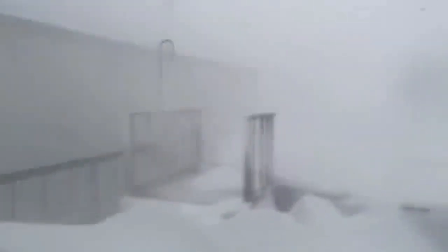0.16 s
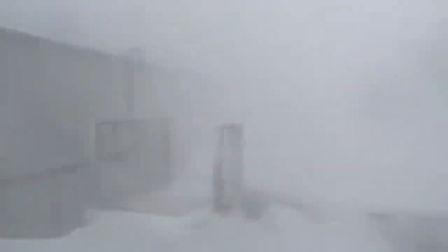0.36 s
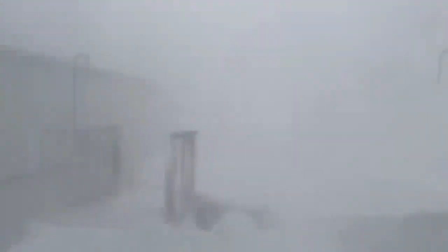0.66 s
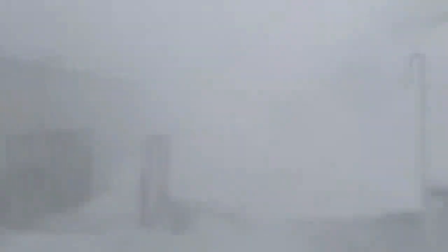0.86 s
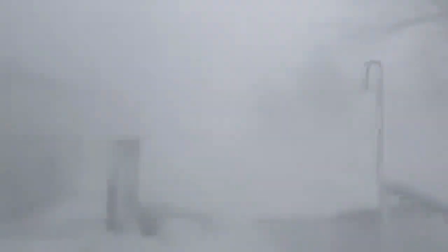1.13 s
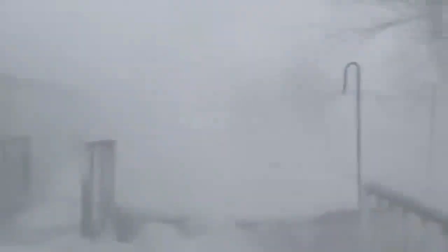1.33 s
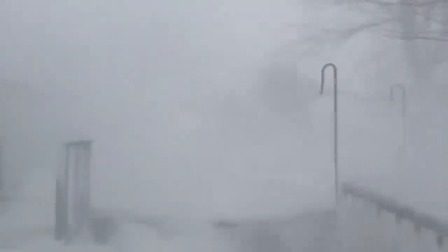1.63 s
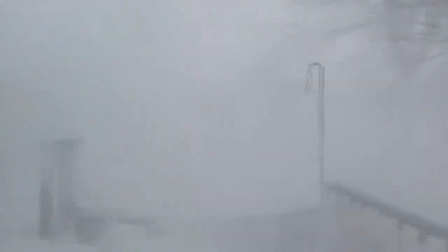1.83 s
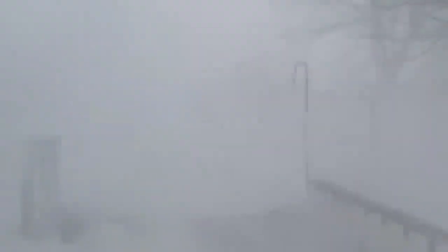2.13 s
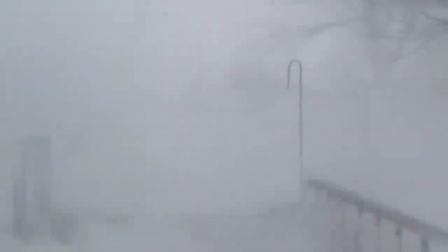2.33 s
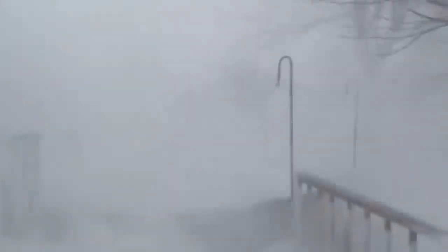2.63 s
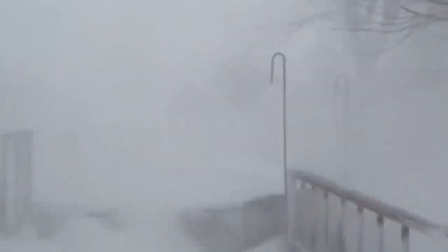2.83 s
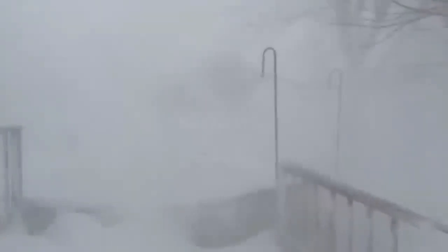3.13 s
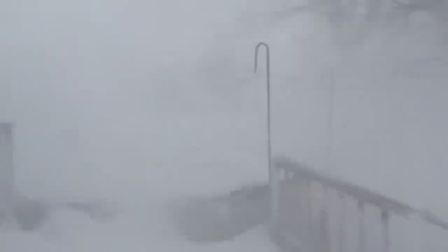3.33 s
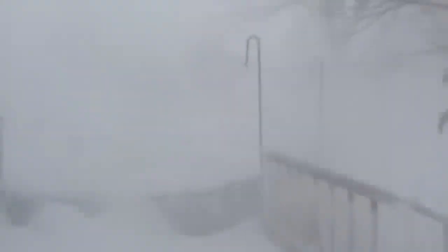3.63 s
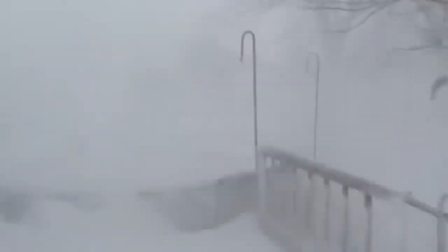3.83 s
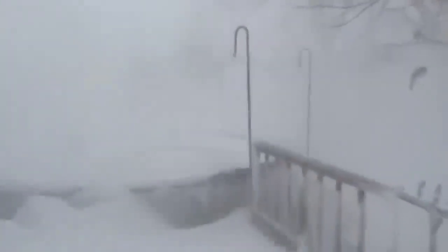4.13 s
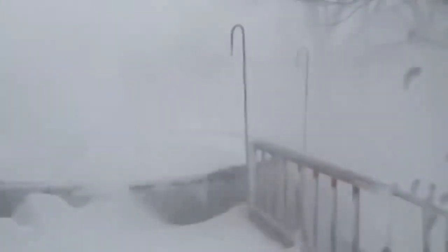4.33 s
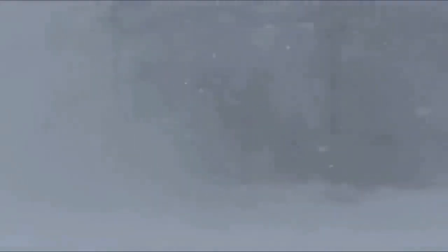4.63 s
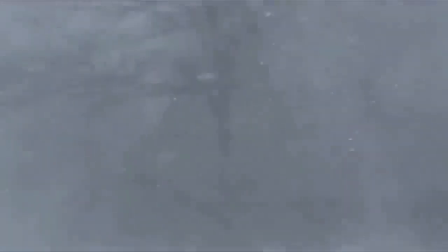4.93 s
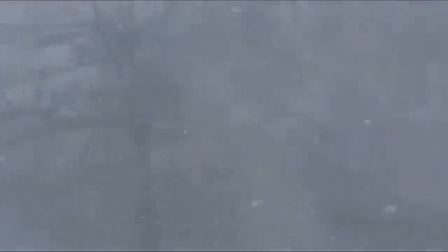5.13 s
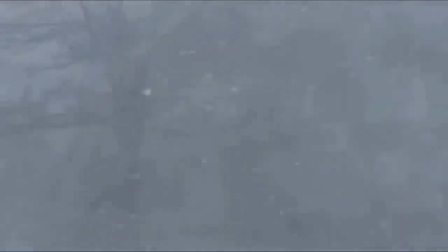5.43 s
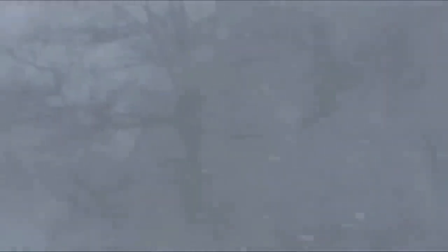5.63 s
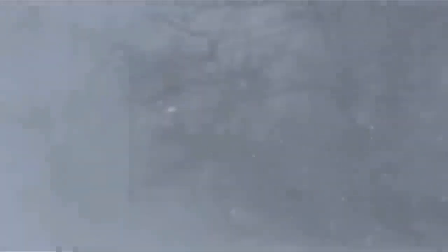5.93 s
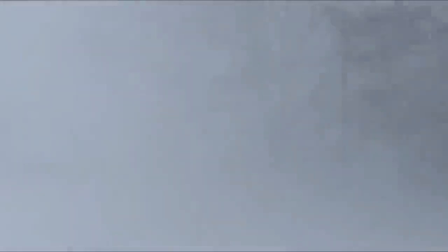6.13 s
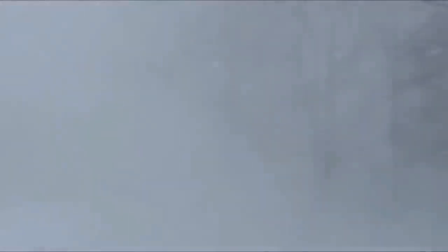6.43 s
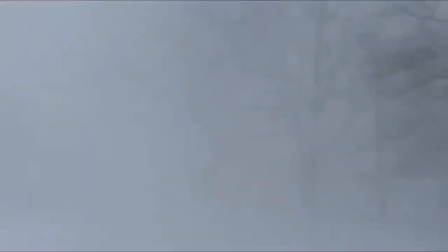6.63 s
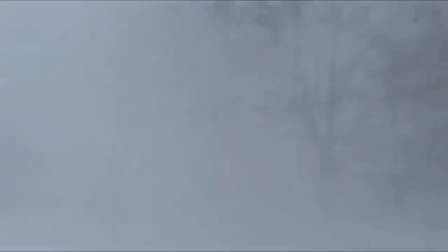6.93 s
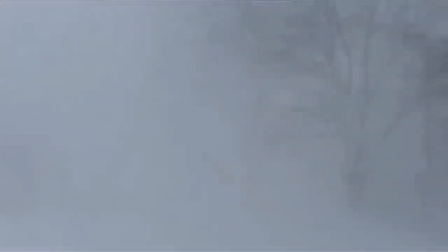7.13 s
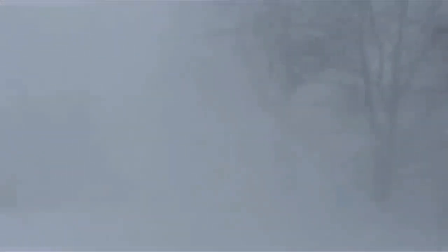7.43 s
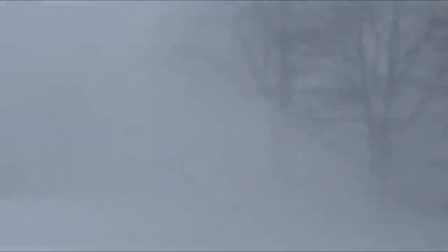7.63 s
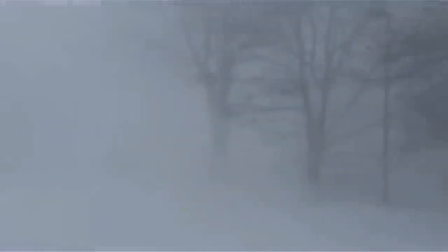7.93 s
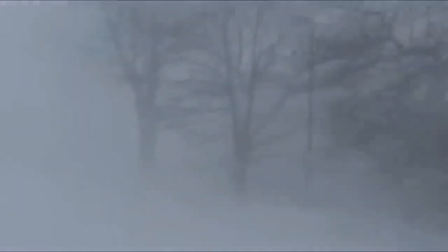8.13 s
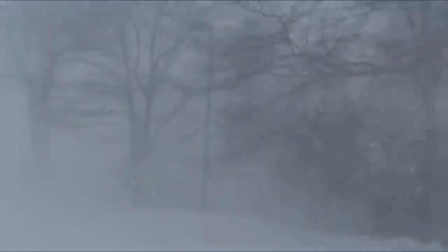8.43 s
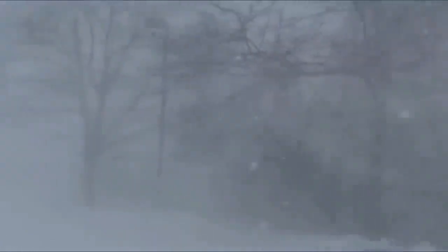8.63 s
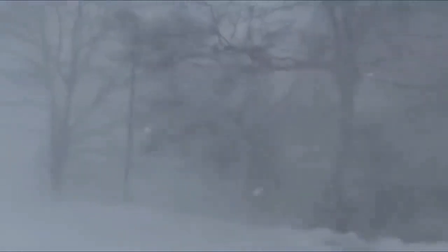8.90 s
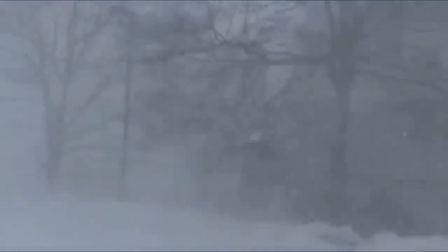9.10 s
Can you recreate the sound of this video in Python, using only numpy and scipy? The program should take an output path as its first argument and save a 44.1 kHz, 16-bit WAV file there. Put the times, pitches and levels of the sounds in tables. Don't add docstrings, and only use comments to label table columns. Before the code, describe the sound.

Gusty snowstorm wind in the open: soft rumbling puffs, a sudden cut, then violent distorted buffeting over a distant roar and snow hiss.

```python
import sys
import numpy as np
from scipy import signal
from scipy.io import wavfile
from scipy.ndimage import uniform_filter1d

SR = 44100
rng = np.random.default_rng(int(sys.argv[2]) if len(sys.argv) > 2 else 0)


def dump(signal):
    limited = np.clip(np.atleast_2d(signal).T, -1, 1)
    pcm = np.round(limited * 32767).astype(np.int16)
    wavfile.write(sys.argv[1], SR, pcm)


def invert_db(level):
    return 10 ** (np.asarray(level, dtype=float) / 20)


N = 408366
CUT_START_S, CUT_END_S = 4.4405, 4.4465
TURN_S = 8.6
# [t/s, f/Hz]
SPLIT = [(0, 138), (2.15, 137), (2.35, 335), (4.44, 330), (4.46, 885), (5.05, 900), (5.25, 530), (5.7, 446),
         (6.2, 477), (6.4, 657), (8.6, 655), (9.26, 460)]


def evened(x):
    return x / np.sqrt(np.mean(x ** 2) + 1e-20)


def spectrum(points, hz):
    f, value = np.transpose(points)
    return np.interp(np.log(hz + 1), np.log(f + 1), value)


def follow(rows, t):
    s, *columns = np.transpose(rows)
    return [np.interp(t, s, c) for c in columns]


def wander(t, lo_hz, hi_hz):
    rates = np.geomspace(lo_hz, hi_hz, num=30)
    phases = rng.random(30)
    return evened(sum(np.sin(2 * np.pi * (f * t + p)) / f ** 0.066 for f, p in zip(rates, phases)))


def frame_grid(size):
    return np.arange(4 * N // size + 5) * size / 4 / SR, np.fft.rfftfreq(size, 1 / SR)[:, None]


def noise(gain):
    size = 2 * len(gain) - 2
    a, b = rng.standard_normal((gain.shape[1], len(gain), 2)).T
    return 1.26 * signal.istft(gain * (a + 1j * b), nperseg=size, noverlap=3 * size // 4)[1][:N]


def unit(gain, hz, lo_hz, hi_hz):
    return gain / np.sqrt((gain ** 2 * (hz > lo_hz) * (hz < hi_hz)).sum(0) + 1e-20)


def drifting_patches(shape, bins, frames):
    patches = rng.standard_normal(shape[::-1]).T
    patches = uniform_filter1d(patches, size=bins, axis=0)
    return evened(uniform_filter1d(patches, size=frames, axis=1))


def gusting(rows, t, steady_db, steady_reach_db):
    s, db, length, *reach_db = np.transpose(rows)[:, :, None]
    fall_db, rise, blunt = 23.5, 1.194, 1.344
    away = abs(t - s) / length * np.where(t < s, rise, 1)
    power = invert_db(2 * (db - fall_db * away ** blunt))
    steady = invert_db(2 * steady_db)
    total = power.sum(0) + steady
    mixed = (power * sum(reach_db)).sum(0) + steady * steady_reach_db
    return 10 * np.log10(total), mixed / total


def eddies(level_db, reach_db, hz, low_hz, corner_hz, top_hz, tilt, band):
    corner = np.minimum(corner_hz * invert_db(.5 * reach_db), top_hz)
    cliff = 1 / np.sqrt(1 + (hz / corner) ** 20)
    foot = invert_db(-8.0) * np.minimum(corner / (hz + 1), 1) ** 2
    bass_cut = np.sqrt(1 + (low_hz / (hz + 1)) ** 4.5)
    shape = (hz + 1) ** -tilt * (cliff + foot) / bass_cut
    return unit(shape, hz, *band) * invert_db(level_db)


def parting(t, hz):
    return 1 / np.sqrt(1 + (follow(SPLIT, t)[0] / (hz + 1)) ** 12)


def buffeting():
    # [t/s, strength/dB, reach/dB, crosswind/dB]
    steady_air = [(0, -90, 13, -41), (.45, -40, -35, -36), (.65, -66, -31, -45), (1.06, -32, -37, -33),
                  (1.47, -34, -27, -39), (1.68, -49, -26, -52), (2.3, -51, -11, -40.5),
                  (4.44, -62, -21, -43.5), (4.46, -25.5, -10.5, -56), (4.7, -16.5, -4.5, -30),
                  (4.95, -20, 5, -37), (5.1, -15, 21, -32), (5.33, -31, -34, -44), (5.55, -15.5, -22, -33),
                  (5.95, -27.5, -27.5, -37), (6.38, -58, -10, -51), (7.5, -29, -9, -58),
                  (8.55, -26.5, -19.5, -51), (8.64, -21.5, -5.5, -44)]
    # [peak t/s, level/dB, length/s, reach/dB]
    railing_gusts = [(.147, -38, 0.034, -47), (.18, -27, 0.016, -37), (.375, -31.5, 0.071, -13),
                     (.565, -16, 0.091, -30), (1.22, -22, 0.043, -8), (1.35, -17.5, 0.04, -29),
                     (1.58, -14, 0.029, -30), (1.735, -24, 0.021, -41), (1.77, -14.5, 0.056, -34),
                     (1.93, -13.5, 0.049, -26.5), (2.1, -27, 0.088, -26.5)]
    # [peak t/s, level/dB, length/s, reach/dB]
    tree_gusts = [(4.8, -17, 0.37, -19), (5.0, -13.5, 0.046, 10), (5.2, -8, 0.059, 8),
                  (5.453, -16, 0.13, -7.5), (6.116, -15, 0.14, -21), (6.2, -8.5, 0.019, -23),
                  (6.45, -32.5, 0.21, 10), (6.592, -9.5, 0.051, -10.5), (6.674, -7.5, 0.059, -10.5),
                  (6.76, -7, 0.036, -5), (6.841, -3.5, 0.1, -17), (6.891, -3.5, 0.043, -15),
                  (6.948, -1, 0.047, -25.5), (7.065, -5, 0.057, -16.5), (7.108, -2, 0.016, -25),
                  (7.22, -11.5, 0.13, -16.5), (7.259, -4.5, 0.029, -15), (7.32, -17, 0.2, -16.5),
                  (7.715, -9.5, 0.081, -13), (7.785, -15.5, 0.065, -19), (7.883, -6, 0.055, -9),
                  (7.972, -13.5, 0.12, -17.5), (8.113, -14, 0.077, -15), (8.358, -11.5, 0.036, -16.5),
                  (8.488, -17, 0.042, -8), (8.779, -16, 0.17, -28.5), (8.92, -15, 0.28, -29),
                  (9.11, -9.5, 0.19, -22), (9.24, -14, 0.5, -17.5)]
    t, hz = frame_grid(size=512)
    wind_db, reach_db, cross_db = follow(steady_air, t)
    body_db, reach_db = gusting(railing_gusts + tree_gusts, t, wind_db, reach_db)
    flicker = wander(t, 9, 70) * (1 - 0.29 * invert_db(2 * (wind_db - body_db)))
    body = eddies(body_db + 3.4 * flicker - .7, reach_db + 1.3 * flicker + 0.062, hz,
                  low_hz=121.0, corner_hz=1764, top_hz=2650, tilt=0.84, band=(150, 700))
    apart, leak = one_port_eddies(t, hz, body_db, cross_db)
    return noise(body) + thumps(t, wind_db), apart, leak


def thumps(t, wind_db):
    # [peak t/s, level/dB, length/s]
    swells = [(.545, -16, 0.11), (1.22, -16.5, 0.12), (1.55, -9, 0.091), (1.76, -20, 0.12),
              (1.93, -12.5, 0.14), (2.1, -13.5, 0.05), (4.88, -13, 0.043), (5.0, -5, 0.041),
              (5.15, -4, 0.12), (5.26, -6.5, 0.044), (5.45, -3, 0.054), (5.59, -9, 0.22), (5.81, 2, 0.054),
              (6.12, -7.5, 0.079), (6.2, -12.5, 0.092), (6.45, -14, 0.044), (6.59, 2, 0.029),
              (6.83, 3.5, 0.085), (6.92, -0.5, 0.015), (7.0, -6.5, 0.35), (7.11, -1.5, 0.03),
              (7.26, 4, 0.044), (7.88, 8, 0.041), (8.03, -9, 0.066), (8.36, -17.5, 0.12), (8.49, -17, 0.08),
              (8.75, -16, 0.37), (8.87, -6.5, 0.097), (9.03, -7, 0.11), (9.23, -7.5, 0.5)]
    # [f/Hz, level/dB per Hz]
    thump_tone = [(13, -21), (25, -13.5), (45, 4), (84, 4), (200, -14.5), (420, -130)]
    thump_db = gusting(swells, t, 0.47 * wind_db - 12, 0)[0]
    slow, low_hz = frame_grid(size=4096)
    thump = evened(noise(invert_db(spectrum(thump_tone, low_hz) + 0 * slow)))
    lumps_db = thump_db + 1.63 * wander(t, 6.3, 30) - .7
    return invert_db(np.interp(np.arange(N) / SR, t, lumps_db)) * thump


def one_port_eddies(t, hz, body_db, cross_db):
    # [peak t/s, level/dB, length/s, reach/dB]
    crosswind_gusts = [(.55, -18, 0.062, -6.5), (.9, -40, 0.29, -25), (1.16, -17.5, 0.06, -19),
                       (1.23, -16, 0.017, -25), (1.58, -14.5, 0.034, -27), (1.9, -33.5, 0.47, -35),
                       (1.5, -22, 0.14, -27), (4.62, -23.5, .08, -26.5), (4.77, -22, 0.34, -16.5),
                       (4.91, -16.5, 0.11, -17), (5.02, -18, .1, -26), (5.1, -8, 0.031, -10),
                       (5.17, -6.5, 0.03, -19.5), (5.46, -32.5, 0.26, 18), (5.57, -22, 0.07, -1),
                       (5.66, -20, 0.23, -26), (5.81, -20.5, 0.12, -19.5), (5.99, -28, 0.054, -9),
                       (6.12, -16, 0.073, -21.5), (6.18, -31, 0.03, -6), (6.28, -32, 0.073, -25),
                       (6.6, -26, 0.044, -25), (6.82, -19.5, 0.13, -7.5), (7.07, -26.5, 0.13, 6),
                       (7.43, -28, 0.094, -18), (7.61, -33, 0.052, -16), (7.8, -28, 0.051, -21),
                       (8.0, -27.5, 0.12, -27.5), (8.12, -20, 0.037, -25), (8.35, -28, 0.062, -26),
                       (8.5, -28, 0.17, -29), (8.68, -28, 0.089, -32), (8.74, -22, 0.03, -15),
                       (8.77, -15, 0.03, -25), (8.81, -13, 0.05, 0), (8.84, -21, 0.022, -8),
                       (8.9, -12.5, 0.088, -24), (8.965, -10, 0.05, 3), (9.005, -10, 0.027, -5),
                       (9.095, -8.5, 0.13, -7), (9.18, -9, .025, -5), (9.21, -8.5, 0.043, -7),
                       (9.245, -14, 0.046, -10)]
    # [peak t/s, level/dB, length/s, reach/dB]
    fizzes = [(1.145, -27.5, 0.011, -9), (1.16, -21.5, 0.011, -9), (1.175, -27, .015, -11),
              (1.19, -27, .012, -12), (5.71, -38, 0.036, -22), (5.81, -34, 0.032, -24),
              (8.645, -31.5, 0.056, -9), (8.7, -31.5, 0.067, -6.5), (8.715, -28, .008, 4),
              (8.76, -38.5, 0.042, -6), (8.81, -21.5, 0.061, -2), (8.845, -14, 0.013, 0),
              (8.866, -19, 0.013, 0), (8.897, -18, 0.027, -7.5), (8.922, -16.5, 0.022, 7),
              (8.97, -25, .04, -9), (8.993, -17.5, 0.014, 2), (9.01, -17.5, 0.033, 1),
              (9.055, -30.5, .05, 0), (9.082, -12.5, 0.024, 0), (9.097, -17, 0.019, -2),
              (9.135, -14.5, 0.059, 0), (9.172, -15, 0.042, 0), (9.215, -27, 0.018, 1),
              (9.245, -29.5, 0.036, -8)]
    uneven_db = body_db + np.where(t < CUT_END_S, -17, -22)
    steady_db = 10 * np.log10(invert_db(2 * cross_db) + invert_db(2 * uneven_db))
    level_db, reach_db = gusting(crosswind_gusts, t, steady_db, -28)
    flicker = wander(t, 27, 90)
    apart = eddies(level_db + 1.4 * flicker - 4.5, reach_db + 3.8 * flicker, hz,
                   low_hz=follow(SPLIT, t)[0], corner_hz=5060, top_hz=4800, tilt=0.97, band=(400, 1500))
    leak = invert_db(0.7 + 0.28 * np.minimum(reach_db + 2.0, 0)) * apart
    leak = leak / np.sqrt(1 + (1200 / (hz + 1)) ** 10 + (hz / 5000) ** 24)
    fizz = eddies(*gusting(fizzes, t, -86, 0), hz,
                  low_hz=980, corner_hz=4870, top_hz=4560, tilt=0.8, band=(1000, 4000))
    fizz = fizz * invert_db(2.5 * flicker - 2.2) / np.sqrt(1 + (hz / 5000) ** 36)
    leak = np.hypot(leak * (t < TURN_S), fizz)
    apart = apart / np.where(t < TURN_S, 1, (1 + (hz / 1400) ** 4) ** 0.11)
    return noise(apart * parting(t, hz)), leak


def clumped(gain):
    patches = drifting_patches(gain.shape, bins=4, frames=16)
    depth_db = np.where(frame_grid(size=512)[0] < TURN_S, 4.4, 2.0)
    return noise(gain * invert_db(depth_db * patches - 2.7))


def storm():
    # [t/s, level/dB]
    hiss_curve = [(0, -64.5), (.7, -62), (2.65, -59.5), (4.44, -59.5), (4.446, -51), (4.5, -43.5),
                  (4.7, -45.5), (6.7, -48), (7.2, -53.5), (8.3, -54), (9.26, -52)]
    # [f/Hz, level/dB per Hz]
    roar_tone = [
        [(20, -35), (35, 4), (60, -6.5), (150, -5.5), (400, -14), (1100, -25), (4500, -41), (6000, -61)],
        [(40, -56), (200, -16), (560, -15), (930, 2), (1500, -11), (3400, -14), (3900, -42), (5000, -19), (6000, -65)],
    ]
    # [f/Hz, level/dB per Hz]
    railing_hiss = [
        [(2600, -19), (4400, -18), (4900, -10), (5400, 5), (8700, 1.5), (9900, -6.5), (11300, -11.5), (13000, -51)],
        [(4300, -44), (4600, 4), (5200, -3), (5800, -38), (7600, -29), (8300, -4), (11300, -1), (12500, -44)],
    ]
    # [f/Hz, level/dB per Hz]
    tree_hiss = [
        [(2000, -20), (3500, -4.5), (9200, -5), (11000, -11), (11800, -24), (12800, -22.5), (13300, -50)],
        [(2000, -38), (3500, -2.5), (4500, -2), (10800, -4), (11200, -19), (11800, -29), (12800, -25), (13300, -48)],
    ]
    t, hz = frame_grid(size=1024)
    hiss_db, = follow(hiss_curve, t)
    first_shot = t < CUT_END_S
    out = []
    for k, roar_trim_db, near_trim_db, trees_trim_db in ((0, -7, -1, 0.33), (1, -19.5, -11.5, -1)):
        patches = drifting_patches((len(hz), len(t)), bins=10, frames=12)
        roar_db = hiss_db + np.where(first_shot, 28, 24) + roar_trim_db + 1.3 * wander(t, 3, 22)
        roar = unit(invert_db(spectrum(roar_tone[k], hz)), hz, 200, 2000) * invert_db(roar_db)
        near = unit(invert_db(spectrum(railing_hiss[k], hz)), hz, 4950, 8640) * invert_db(near_trim_db)
        trees = unit(invert_db(spectrum(tree_hiss[k], hz)), hz, 3960, 11900) * invert_db(trees_trim_db)
        hiss = np.where(first_shot, near, trees) * invert_db(hiss_db)
        out.append(noise(parting(t, hz) ** k * np.hypot(roar, hiss) * invert_db(1.05 * patches)))
    return out


def slaps():
    # [peak t/s, level/dB, reach/dB, length/s]
    railing_slaps = [(0.244, -32, -34, 0.0055), (0.279, -31.5, -40, 0.0057), (0.352, -18, -27, 0.014),
                     (0.37, -27, -20, 0.0088), (0.525, -14.5, -8.5, 0.014), (0.557, -24.5, 4, 0.031),
                     (0.579, -16, -18, 0.011), (0.387, -29, -41.5, 0.011), (0.607, -27, -44, 0.0098),
                     (0.678, -28.5, -41, 0.0079), (0.749, -22.5, -35, 0.0084), (0.82, -33.5, -42, 0.0051),
                     (0.905, -15.5, -32.5, 0.0032), (0.977, -21.5, -36, 0.003), (1.125, -29, -41.5, 0.017),
                     (1.164, -16.5, -26, 0.016), (0.417, -27.5, -42, 0.0066), (1.188, -22, -21, 0.015),
                     (1.333, -34, -38, 0.01), (1.387, -34, -45.5, 0.0068), (1.917, -27, -31, .008),
                     (1.23, -15, -21, 0.0067), (1.223, -27, -25, .005), (1.347, -20, -44, 0.0063),
                     (1.5, -13, -31, 0.014), (1.59, -20, -27, 0.0088), (1.936, -7, -24, 0.0056)]
    # [peak t/s, level/dB, reach/dB, length/s]
    tree_slaps = [(4.675, -15, -22.5, 0.029), (4.77, -11.5, -27, 0.0068), (5.18, 5.5, -30, 0.0032),
                  (5.216, -1, -22.5, 0.018), (5.444, 8, -11, 0.0025), (5.462, 1, -21, 0.0094),
                  (5.538, 3.5, -3.5, 0.005), (5.557, 1, -14, 0.013), (6.577, -12.5, -16.5, 0.0063),
                  (6.662, 1, -11.5, 0.0026), (6.746, -1, -15.5, 0.0046), (6.821, -10.5, -8, 0.015),
                  (6.848, -18, -10, 0.0082), (6.873, -9, -15.5, 0.014), (6.888, -4, -19, 0.0082),
                  (6.903, -12, -9, 0.022), (6.929, -2, -23, 0.0062), (6.947, -14, -14, 0.049),
                  (7.052, 1.5, -14.5, 0.0026), (7.064, -6, -10, 0.014), (7.173, 3, -22, 0.0048),
                  (7.187, -13.5, -14, 0.023), (7.25, -13.5, -11.5, 0.05), (7.7176, -7.5, -18, 0.0065),
                  (7.857, -15, -8.5, 0.026), (7.876, 4, -14.5, 0.0077), (7.896, -12, -10, 0.021),
                  (7.772, -16, -22, 0.031), (7.795, -15, -24, 0.0055), (8.016, -23.5, -13.5, 0.019),
                  (8.072, -26, -14, 0.0084), (8.118, -22, -16, .003), (8.343, -11.5, -10, 0.0026),
                  (9.085, -16, -9, 0.01), (9.13, -11.5, -7.5, 0.015)]
    # [peak t/s, level/dB, length/s]
    flutter_rows = [(4.537, -13.5, 0.0083), (4.6, -8, 0.0056), (4.723, -9, 0.0046), (4.667, -5, 0.003),
                    (4.76, -4, 0.0024), (4.788, -11, 0.0044), (4.9, -13, 0.015), (4.983, -15, 0.015),
                    (5.033, -43, 0.014), (5.269, -15, 0.0082), (5.441, -18, 0.005), (5.517, -9, 0.0054),
                    (6.77, -4, 0.0046), (6.786, -2, 0.0058), (7.157, -8, 0.009), (7.238, -4, 0.0086),
                    (7.414, -28, 0.0086), (7.614, -17.5, 0.026), (7.693, -9.5, 0.0064), (7.73, -8, 0.0036),
                    (7.938, -12.5, 0.0068), (7.99, -5.5, 0.0052), (8.015, -11, 0.0087), (8.071, -9, 0.004),
                    (8.086, -12, 0.0072), (8.123, -12, 0.0055), (8.368, -9, 0.0072), (8.464, -17.5, 0.011),
                    (8.645, -19, 0.0067), (5.386, -10.5, 0.0072), (6.022, -18.5, 0.021),
                    (6.06, -11, 0.0039), (5.652, -17.5, 0.0081), (6.106, -12, 0.012), (6.194, -22, 0.0086),
                    (6.224, -34, 0.0047), (6.327, -30, 0.0077), (6.44, -17.5, 0.0055), (6.694, -27, 0.012),
                    (7.001, -9.5, 0.015), (7.02, -4.5, 0.0091), (7.102, 0.5, 0.0042), (7.207, -7, 0.005),
                    (7.282, -3, 0.0063), (7.328, -12, 0.018), (7.367, -10, .009), (7.413, -10.5, 0.023),
                    (7.767, -8, 0.0068), (7.788, -9.5, 0.0085), (7.971, -9, 0.0072), (8.105, -4.5, 0.0041),
                    (8.164, -8, 0.0047), (8.855, -23, 0.0087)]
    t, hz = frame_grid(size=128)
    power = np.zeros((len(hz), len(t)))
    flutters = [(s, db, -27.5 + 0.56 * db, length) for s, db, length in flutter_rows]
    for s, db, reach_db, length in railing_slaps + tree_slaps + flutters:
        middle = round(s * SR / 32)
        near = slice(middle - 60, middle + 60)
        quicker = 1 + 4.1 * (t[near] < s)
        puff_db = -14 * ((t[near] - s) / max(length, .002)) ** 2 * quicker
        puff_db = np.maximum(puff_db, -200)
        puff = eddies(db - 8.0 + puff_db, reach_db + 0.88 * puff_db, hz,
                      low_hz=244, corner_hz=7800, top_hz=9800, tilt=0.99, band=(600, 4000))
        power[:, near] += puff ** 2
    return noise(np.sqrt(power))


def ticks():
    # [t/s, level/dB, f/Hz, t60/s]
    knocks = [
        (1.0374, -15, 154, 0.047),
        (1.222, -29, 6500, 0.0018),
        (2.21, -24, 8400, 0.0022),
        (4.381, -21.5, 150, 0.03),
        (4.381, -39, 7000, .002),
    ]
    out, t = np.zeros(N), np.arange(2000) / SR
    for s, db, hz, t60 in knocks:
        out[round(s * SR):][:2000] += invert_db(db - 60 * t / t60) * np.cos(2 * np.pi * hz * t)
    return out


def whistle():
    # [t/s, f/Hz, level/dB]
    rod_tone = [(2.42, 1420, -51), (2.46, 1523, -50), (2.53, 1600, -53), (2.666, 1669, -49.5),
                (2.716, 1635, -56), (2.76, 1420, -45), (2.81, 1370, -53)]
    out, t = np.zeros(N), np.arange(rod_tone[0][0], rod_tone[-1][0], 1 / SR)
    hz, db = follow(rod_tone, t)
    turns = np.cumsum(hz + 33 * wander(t, 24, 140)) / SR
    level = invert_db(db + 5.5 + 3.4 * wander(t, 18, 90))
    out[round(t[0] * SR):][:len(t)] = level * np.sin(2 * np.pi * turns)
    return out


def spray(dry):
    strained = abs(dry.mean(0)) > 0.62
    over = uniform_filter1d(strained * 1., size=900)
    band = signal.butter(6, (11000, 15500), "band", fs=SR, output="sos")
    return invert_db(-50) * np.sqrt(abs(over)) * signal.sosfilt(band, rng.standard_normal((N, 2)).T)


def thrifty(pair):
    # [f/Hz, share]
    spared = [(11000, .4), (11400, .3), (11800, .04), (12300, .06), (12900, .25), (13400, 0)]
    both = np.array([pair[0] + pair[1], pair[0] - pair[1]]) / 2
    hz, t, z = signal.stft(both, SR, nperseg=1024, noverlap=768)
    hz, power = hz[:, None], abs(z) ** 2
    bands = power[:, :512].reshape(2, 64, 8, -1).mean(2)
    band_of_bin = np.minimum(np.arange(513) // 8, 63)
    now = bands[:, band_of_bin]
    bands = uniform_filter1d(bands, size=9, axis=2)[:, band_of_bin]
    facing_db = np.where(t < TURN_S, -6 - 6 * (hz < 1500), -12 + 8 * (hz > 5000))
    middle_db = np.where(t < CUT_END_S, -14, facing_db)
    apart_db = np.where(hz < 1500, -26, np.where(hz < 4600, -6, -13)) + 0 * t
    hidden_db = np.array([middle_db, apart_db])
    luck = rng.random((len(t) // 6 + 1, 64, 2)).T
    luck = luck.repeat(6, axis=2)[:, band_of_bin, :len(t)]
    keep = bands > bands[::-1] * invert_db(2 * (hidden_db - 3 + 7 * luck - 9 * (luck < .4)))
    strong = bands > invert_db(-176 + 12 * luck + 8 * (hz < 13300))
    lucky = luck[0] < spectrum(spared, hz) * (t > CUT_END_S)
    keep &= (hz < 11000) | strong | lucky
    keep[0] &= (hz < 9300) | (bands[0] > invert_db(-192 + 9 * luck[0]))
    keep &= power > np.clip(hz / 9000, 0, .7) * now
    middle, apart = signal.istft(z * keep, SR, nperseg=1024, noverlap=768)[1][:, :N]
    return np.array([middle + apart, middle - apart])


def scene():
    wind, wind_apart, leak = buffeting()
    far, far_apart = storm()
    tone = whistle()
    middle = wind + slaps() + far + ticks() + .8 * tone + clumped(leak)
    apart = wind_apart + far_apart + 0.5 * tone
    return np.array([middle + apart, middle - apart])


def roll_off(x):
    return signal.sosfilt(signal.butter(12, 15700, fs=SR, output="sos"), x)


def record(dry):
    t = np.arange(N) / SR
    bass_cut = signal.butter(2, 38, "high", fs=SR, output="sos")
    clipped = np.clip(signal.sosfilt(bass_cut, dry), -.975, .975)
    gap = 1 - .95 * (t > CUT_START_S) * (t < CUT_END_S)
    mix = thrifty(clipped + spray(dry)) * uniform_filter1d(gap, size=40)
    return roll_off(mix)


dry = scene()
out = record(dry)
dump(out)
```